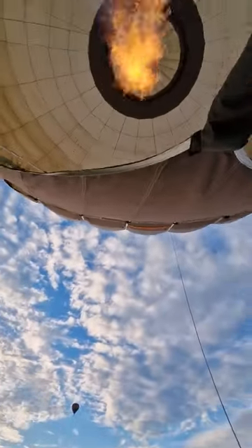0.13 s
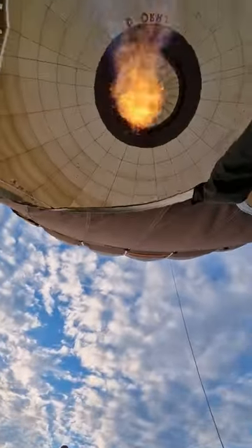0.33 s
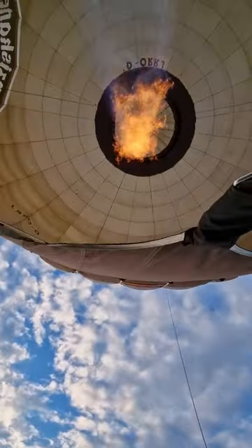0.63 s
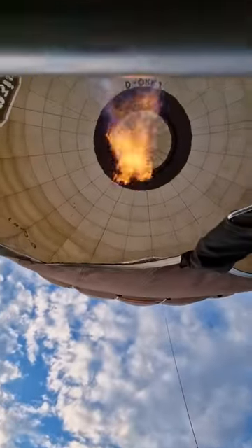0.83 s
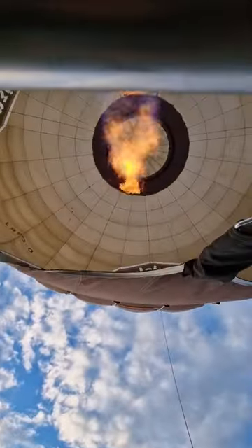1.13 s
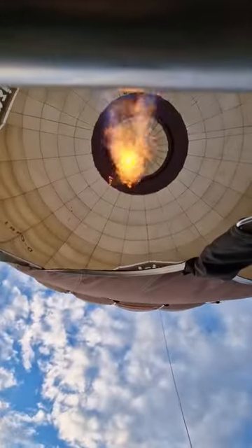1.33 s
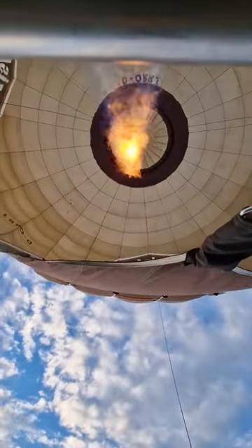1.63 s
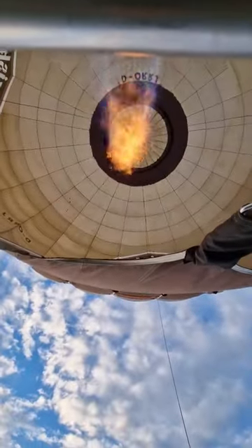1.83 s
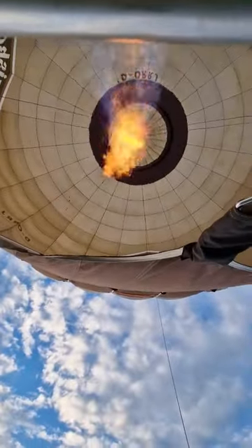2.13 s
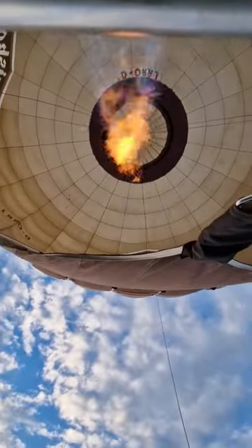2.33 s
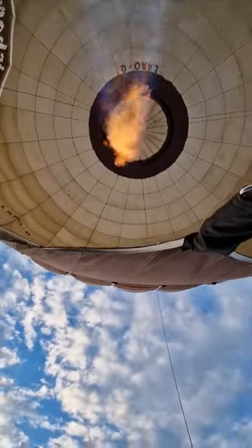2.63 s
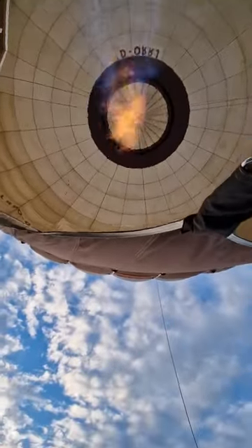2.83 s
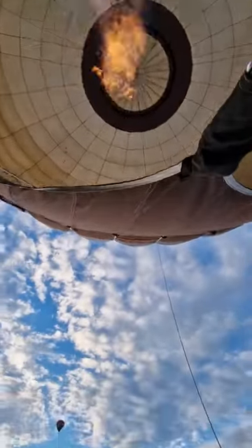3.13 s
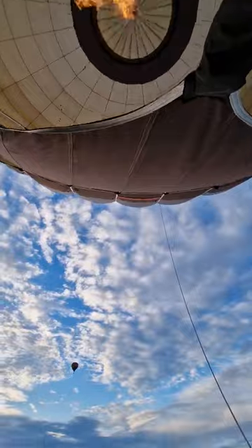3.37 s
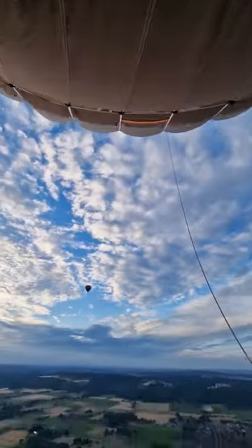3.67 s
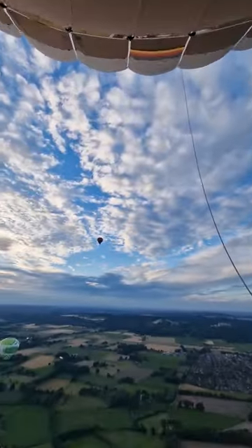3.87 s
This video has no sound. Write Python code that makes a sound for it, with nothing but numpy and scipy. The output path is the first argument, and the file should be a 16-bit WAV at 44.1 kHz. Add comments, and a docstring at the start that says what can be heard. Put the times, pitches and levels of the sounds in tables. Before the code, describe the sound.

A balloon's gas burner roars loudly overhead, deep rumble under a bright hiss, flickering slightly; near the end the hiss sinks, the flame cuts out, leaving a faint pilot whisper. Open air, close stereo phone microphone.

```python
"""A balloon burner roars overhead, a low flame under a hissing gas jet, heard by the two ports of a phone.
The valve closes slowly: the hiss sinks first, then the flame is cut off and a small pilot light whispers on.
Flame and jet are one coloured noise whose bass, middle and treble follow the valve, with random flicker.
The pilot light is a second, much fainter noise that creeps up in pitch and level towards the end.
As the phone tilts, the treble balance and the tiny delay between left and right shift."""
import sys
import numpy as np
from scipy import signal
from scipy.fft import rfft, irfft
from scipy.io import wavfile
from scipy.ndimage import uniform_filter1d, map_coordinates

SR = 44100
rng = np.random.default_rng(int(sys.argv[2]) if len(sys.argv) > 2 else 0)


def persist_wave(psi):
    """Save psi, clipped to +-1, as 16-bit WAV."""
    counts = np.round(np.clip(psi, -1, 1) * 32767).astype(np.int16)
    wavfile.write(sys.argv[1], SR, np.atleast_2d(counts).T)


N = 176400

# Colour of the burner noise at the two ports, before the valve and the flicker change it.
# Each row: frequency in Hz, left level in dB per Hz, right level in dB per Hz,
# likeness of the two ports from 0 to 1, extra phase of the right port in radians.
BURNER_COLOUR = [(22,-62,-64.5,.95,-2),(40.2,-46,-47,0.95,0.5),(60,-38,-40,1,-0.04),(119,-38.5,-39.5,0.99,0.47),(188,-37.5,-41.5,0.95,0.76),(298,-43,-44.5,0.96,0),(370,-43.5,-46,1,-0.4),(431,-47,-55,0.91,-.5),(518,-46,-53,0.95,0.64),(728,-58,-57,1,-0.08),(852,-55,-59.5,0.91,-0.26),(1094,-52,-59,0.87,.5),(1183,-61,-56.5,0.78,0.8),(1436,-57,-57.5,0.92,-0.72),(1700,-63.5,-65,0.77,0),(1970,-62,-64.5,0.9,-0.2),(2420,-64.5,-66,0.3,0.8),(2660,-64.5,-65.5,0.99,0.24),(2900,-67,-67.5,.999,0.15),(3180,-64,-63.5,0.999,0.95),(3300,-62.5,-62.5,.9,.5),(3500,-65.5,-67,0.3,0.4),(3700,-66,-65.5,1,0.18),(4040,-66,-66,0.94,0.93),(4340,-65.5,-64,0.55,0.2),(4780,-63.5,-62.5,0.82,0.25),(5300,-64.5,-62,0.6,-1.2),(6340,-62,-63,0.35,-2),(6900,-61.5,-65,0.35,-4),(7440,-60.5,-67.5,0.2,-2),(8240,-62.5,-80,0.2,-5),(8770,-66.5,-79,0.3,-1),(10450,-66.5,-73,0,1),(11900,-62.5,-64.5,0.15,0),(13300,-61,-65.5,0.1,0),(15400,-58.5,-67,0,0)]
# Colour of the pilot light and still air, before swell, flicker and rise.
# Each row: frequency in Hz, left level in dB per Hz, right level in dB per Hz,
# likeness of the two ports from 0 to 1, extra phase of the right port in radians.
PILOT_COLOUR = [(40,-79,-78,.97,1.5),(129,-72,-74,1,-0.7),(300,-84.5,-83,1,0.5),(553,-89,-97,0.3,0.5),(804,-105,-104,.15,-0.5),(1100,-96.5,-96,.68,0.5),(1400,-103,-105,.5,1),(1800,-102.5,-101,.4,0),(2210,-95,-94,.66,0),(2600,-103.6,-103.8,.95,2.5),(3100,-101,-101.1,.999,-0.2),(3850,-102,-101.9,.995,.8),(4200,-101,-100,0.5,0),(4770,-95,-91,.5,-1.5),(5100,-89,-83,0.8,0),(5400,-96.5,-92,.4,1),(5900,-97,-92,.27,-2.5),(7040,-103,-100,0.1,1),(7850,-99,-102,.1,-4.5),(8300,-84,-99,0,0),(8700,-98.5,-104,0,0),(9300,-100,-105,0,0),(11000,-101.5,-102,0,0),(12800,-100,-99,0,0),(13500,-91,-91,0,0),(14200,-98,-95,0,0),(15400,-108,-108,0,0)]
# How the closing valve changes the burner.
# Each row: time in seconds, flame roar in dB, middle band in dB, jet hiss in dB.
VALVE_CLOSING = [(0, -0.5, 1, 0), (.5, 0.5, 1.5, -0.1), (1, 0.5, -.5, -1.5), (1.5, 0.5, -1.5, -0.5),
                 (2, 0.5, -1.5, -1), (2.5, -0.5, -1, -1), (2.87, 0.5, 0.5, -1.5), (3.15, -0.5, -3, -5),
                 (3.38, -3.5, -4, -8.5), (3.48, -3.5, -8.5, -12.5), (3.55, -8.5, -17.5, -19),
                 (3.6, -19.5, -27.5, -34), (3.65, -32, -38, -45), (3.685, -48, -48, -54),
                 (3.74, -61, -55, -60), (4, -65, -80, -80)]
# How the phone tilts.
# Each row: time in seconds, extra treble at the left port over the right in dB,
# extra lag of the right port in millionths of a second.
PHONE_TILT = [(0, -3, 7), (.5, -2.5, 18.5), (.85, 1, 2), (1.75, -0.5, -2), (2.3, -0.5, -17),
              (2.6, -1.5, -22), (2.9, -3, -1), (3.5, -2.5, -20), (3.65, -2, -31), (4, -1, -100)]

# Where each sound column of the valve table rules
ROAR_HZ, MIDDLE_HZ, HISS_HZ = 400, 1660, 4070
# A dying flame keeps its deep rumble longest; the flame column holds exactly at FLAME_HZ
FLAME_HZ, FLAME_DARKEN_PER_OCT = 151, 0.21
TOP_SINK_PER_OCT = 0.22  # higher hiss follows the valve more steeply
# Random movement of the burner, in dB per unit of a random curve
SURGE_DB, NEIGHBOUR_DB, FLICKER_DB = 0.4, 0.3, 0.5
SHARED_FLUTTER_DB, OWN_FLUTTER_DB = 0.31, 1.22
FLUTTER_HOLD_S = 0.073  # slower changes than this are taken out of the flutter
# Tilting shades the right port most around SHADE_HZ; the gain is dB of shade per dB of tilt
SHADE_HZ, SHADE_OCT, SHADE_GAIN = 9450, 0.18, 0.69
PILOT_SWELL_DB, PILOT_FLICKER_DB = -0.7, 2.2  # dB per unit of a random curve
# Pitch speeds up by this share each second, passing normal speed at the middle time
PILOT_GLIDE_PER_S, PILOT_GLIDE_MID_S = 0.083, 3.82
PILOT_RISE_DB_PER_S = 9  # full rise from HISS_HZ up, less below
BURNER_LAG_S, PILOT_LAG_S = 23 / 44100, 22 / 44100  # the right port hears it later
SHAKE_US = 4.2  # the hand's unsteadiness: millionths of a second per unit of a random curve
TOP_HZ = 15480  # the phone passes nothing much above this


def undb(db):
    """Turn decibels into a plain multiplier."""
    return 10 ** (np.asarray(db) / 20)


def walk(rate):
    """Random levels, each held for 1 / rate seconds, then smoothed twice; spread near 1."""
    hold = int(SR / rate)
    steps = np.repeat(rng.standard_normal(N // hold + 1), hold)
    smooth = uniform_filter1d(uniform_filter1d(steps, hold), hold)
    return 1.4 * smooth[:N]


def quick(rate):
    """A random walk without its slow part, leaving only the fast flutter."""
    curve = walk(rate)
    return curve - uniform_filter1d(curve, int(FLUTTER_HOLD_S * SR))


def ports(table, lag_s, level_db):
    """Noise coloured for two ports that partly agree; each half octave follows level_db(hz) over time."""
    hz, left_db, right_db, likeness, turn = np.array(table).T
    f = np.arange(N // 2 + 1) * SR / N + 1e-3  # the small extra avoids log(0)

    def read(column):
        return np.interp(np.log(f), np.log(hz), column)

    noise = rfft(rng.standard_normal((2, N))) * np.sqrt(SR / 2)  # 0 dB per Hz
    first, second = noise * np.minimum(f / hz[0], 1) ** 2  # fade below the lowest row
    # The right port mixes a delayed copy of the left noise with noise of its own
    same = np.clip(read(likeness), 0, 1)
    delayed = first * np.exp(1j * (read(turn) - 2 * np.pi * f * lag_s))
    right = same * delayed + np.sqrt(1 - same ** 2) * second
    both = np.array([first * undb(read(left_db)), right * undb(read(right_db))])

    # Overlapping half-octave bands, counted from 30 Hz
    place = np.clip(2 * np.log2(f / 30), 0, 18)
    out = 0
    for k in range(19):
        band = irfft(both * np.maximum(1 - abs(place - k), 0), N)
        out = out + band * undb(level_db(30 * 2 ** (k / 2)))
    return out


def burner(t):
    """Turbulent noise: bass follows the flame, treble the gas jet; bands surge together and flicker alone."""
    valve_s, *columns = np.array(VALVE_CLOSING).T
    flame, middle, jet = (np.interp(t, valve_s, column) for column in columns)
    tilt_s, treble_db, _ = np.array(PHONE_TILT).T
    tilt = np.interp(t, tilt_s, treble_db)
    surge, low, high = walk(3.3), walk(8.44), walk(8.9)
    shared_flutter = quick(42)

    def level_db(hz):
        # How much this band belongs to the jet: 0 in the roar, 1 in the hiss
        share = np.clip(np.log(hz / ROAR_HZ) / np.log(HISS_HZ / ROAR_HZ), 0, 1)
        top = max(np.log2(hz / HISS_HZ), 0)  # octaves above the hiss point

        # Blend the three valve columns by pitch
        centres = np.log([ROAR_HZ, MIDDLE_HZ, HISS_HZ])
        low_w, mid_w, top_w = (np.interp(np.log(hz), centres, w) for w in np.eye(3))
        roar = flame * (1 + FLAME_DARKEN_PER_OCT * np.log2(hz / FLAME_HZ))
        hiss = jet * (1 + TOP_SINK_PER_OCT * top)
        valve = low_w * roar + mid_w * middle + top_w * hiss

        # Random movement: all bands, neighbouring bands, this band alone, then the jet's flutter
        chance = SURGE_DB * surge
        chance = chance + NEIGHBOUR_DB * (low + share * (high - low))
        chance = chance + FLICKER_DB * (1 - 0.36 * share) * walk(12)
        flutter = SHARED_FLUTTER_DB * shared_flutter + OWN_FLUTTER_DB * quick(42)
        chance = chance + share * flutter

        # Tilting lifts the treble on one side and lowers it on the other
        half = min(top, 1) / 2
        shade = SHADE_GAIN * np.exp(-(np.log2(hz / SHADE_HZ) / SHADE_OCT) ** 2)
        return valve + tilt * np.array([[half], [-half - shade]]) + chance

    return ports(BURNER_COLOUR, BURNER_LAG_S, level_db)


def pilot(t):
    """A small flame's faint flutter and narrow hiss bands, creeping up in pitch and level near the end."""
    swell = walk(4.1)
    late = np.clip(t - PILOT_GLIDE_MID_S, -0.3, 1)

    def level_db(hz):
        rise = PILOT_RISE_DB_PER_S * late * min(hz / HISS_HZ, 1)
        return PILOT_SWELL_DB * swell + PILOT_FLICKER_DB * walk(34) + rise

    whisper = ports(PILOT_COLOUR, PILOT_LAG_S, level_db)
    # Reading the noise faster and faster raises its pitch
    place = np.cumsum(1 + PILOT_GLIDE_PER_S * late)
    return np.array([map_coordinates(side, [place], order=5, mode="mirror") for side in whisper])


def scene():
    """Burner and pilot light together; the tilting, unsteady phone shifts the right port in time."""
    t = np.arange(N) / SR
    left, right = burner(t) + pilot(t)
    tilt_s, _, lag_us = np.array(PHONE_TILT).T
    lag_s = (np.interp(t, tilt_s, lag_us) + SHAKE_US * walk(6)) / 1e6
    shifted = map_coordinates(right, [(t - lag_s) * SR], order=5, mode="mirror")
    return np.array([left, shifted])


def record(dry):
    """The phone rounds the loudest peaks and cuts the top with a steep low-pass filter."""
    rounded = np.tanh(0.6 * dry) / 0.6
    top_cut = signal.ellip(16, 0.3, 70, TOP_HZ, fs=SR, output="sos")
    return signal.sosfilt(top_cut, rounded)


dry = scene()
out = record(dry)
persist_wave(out)
```